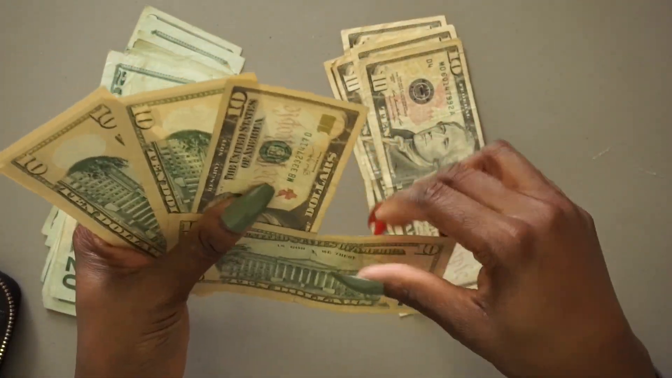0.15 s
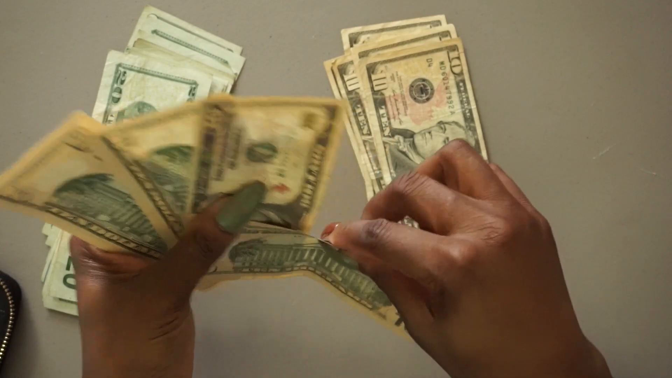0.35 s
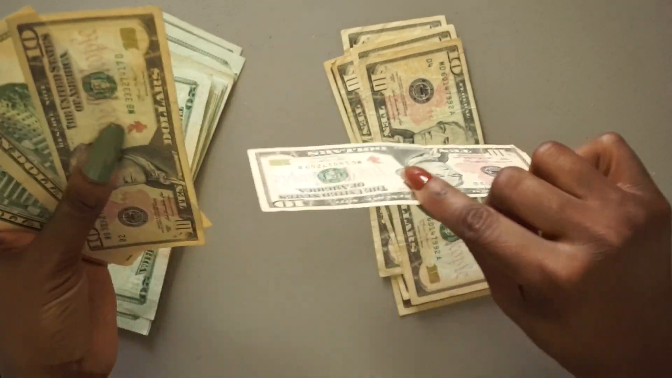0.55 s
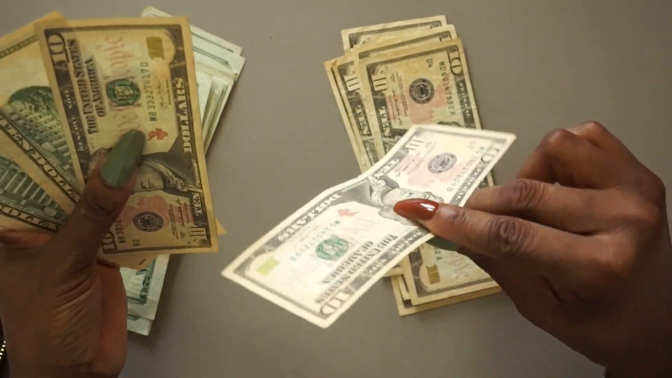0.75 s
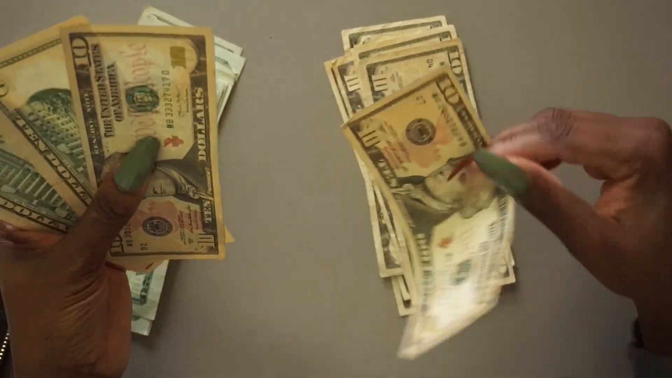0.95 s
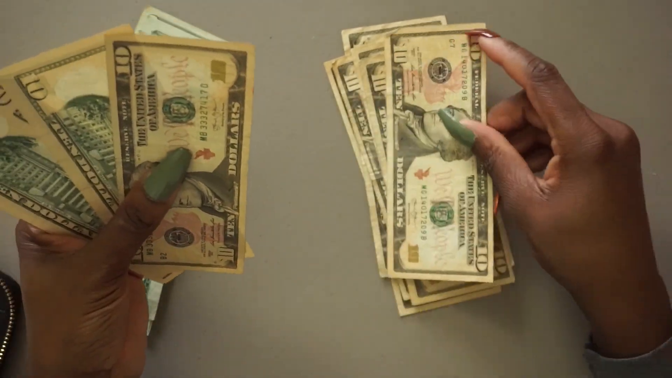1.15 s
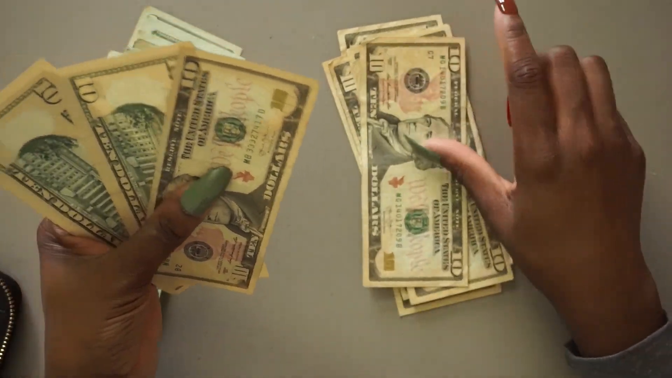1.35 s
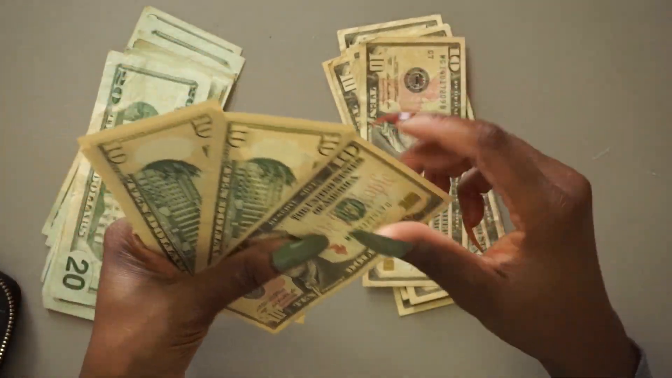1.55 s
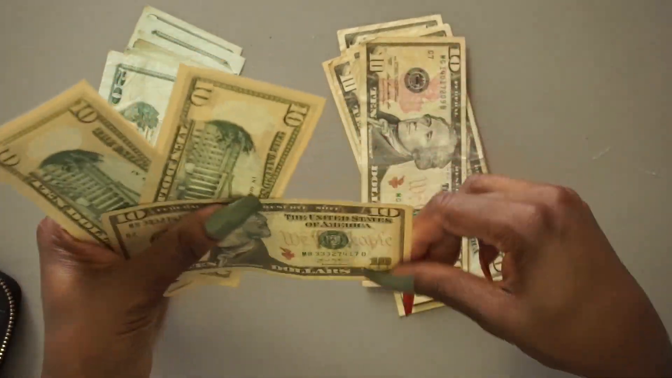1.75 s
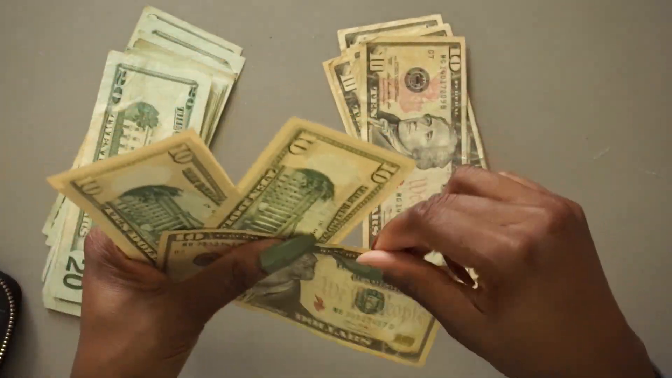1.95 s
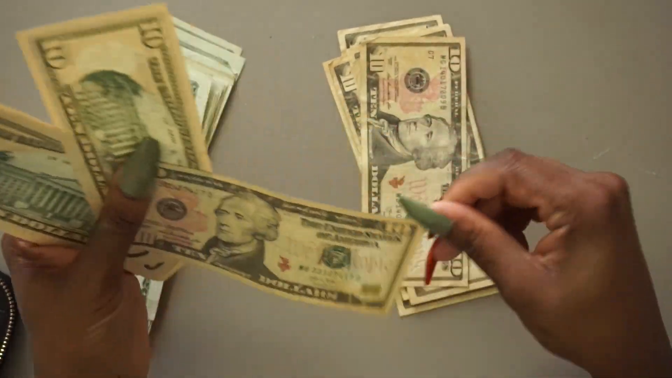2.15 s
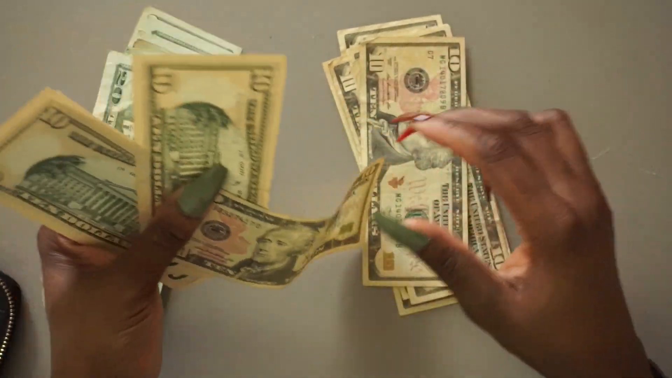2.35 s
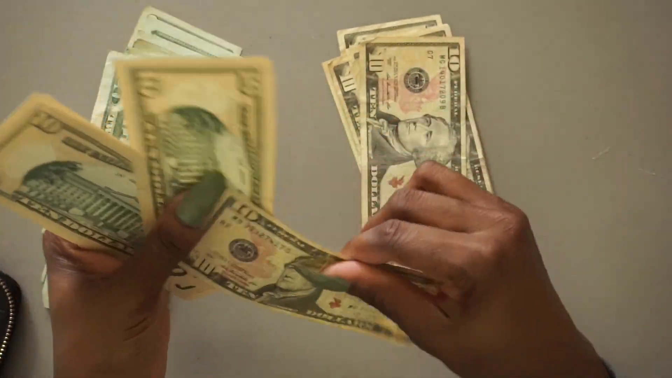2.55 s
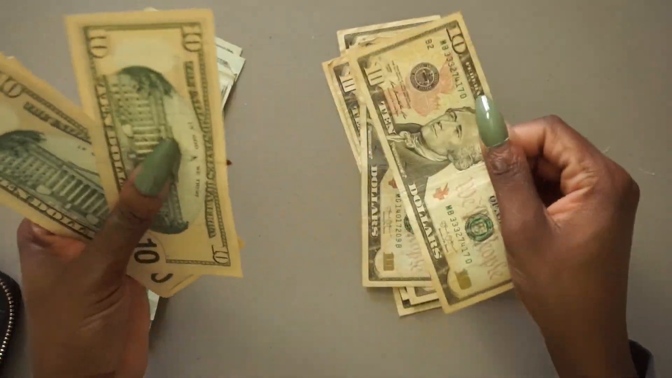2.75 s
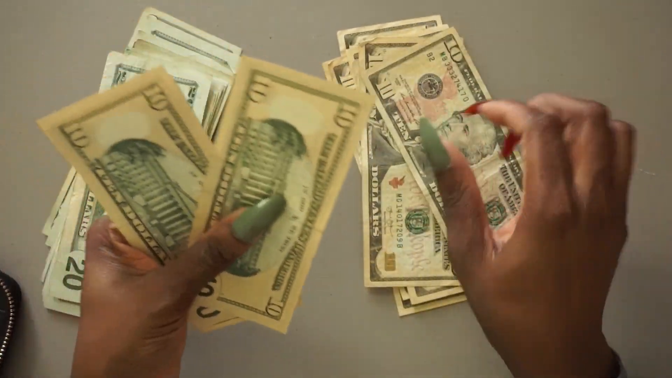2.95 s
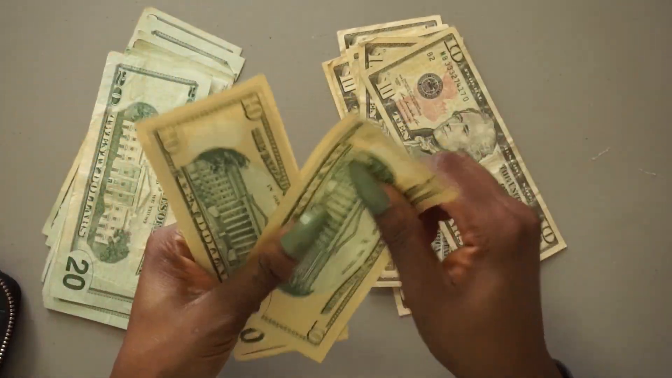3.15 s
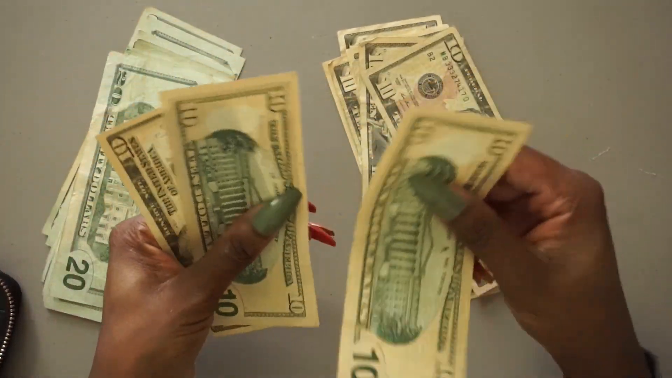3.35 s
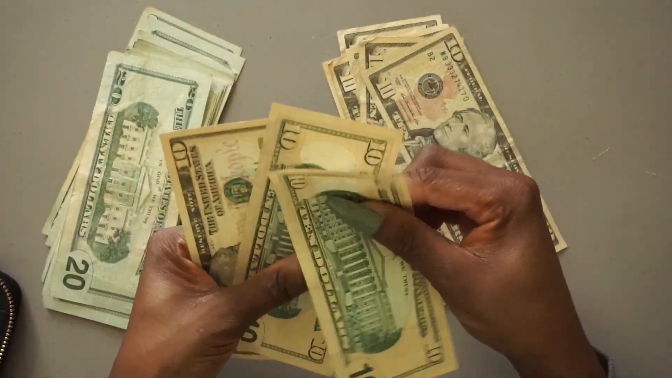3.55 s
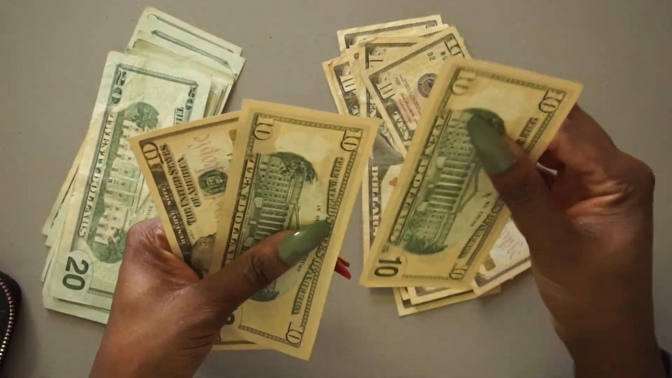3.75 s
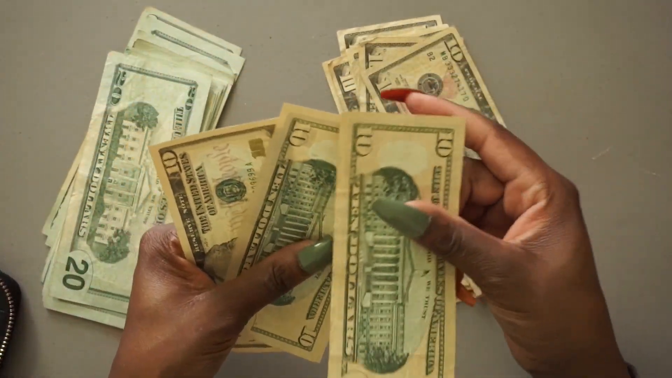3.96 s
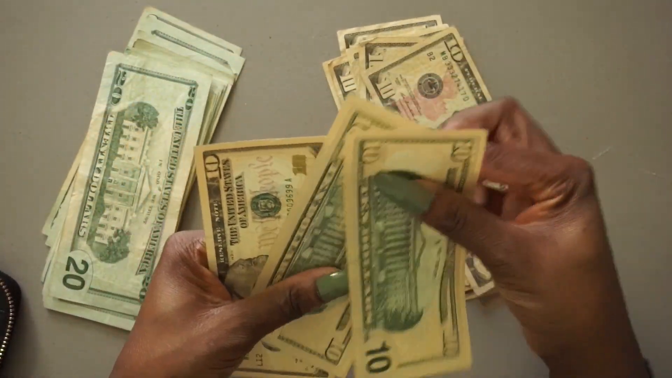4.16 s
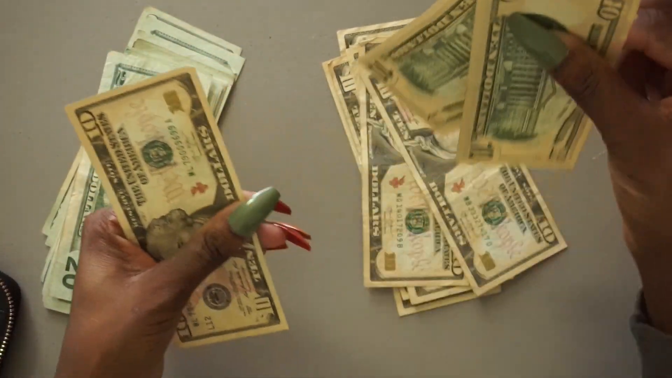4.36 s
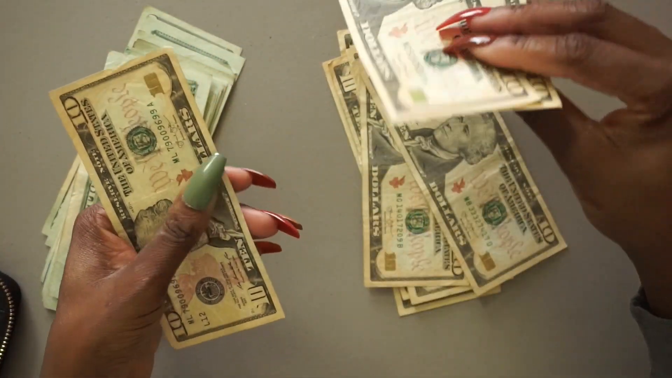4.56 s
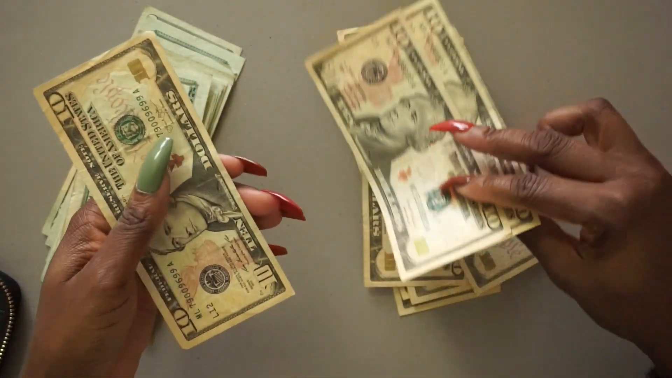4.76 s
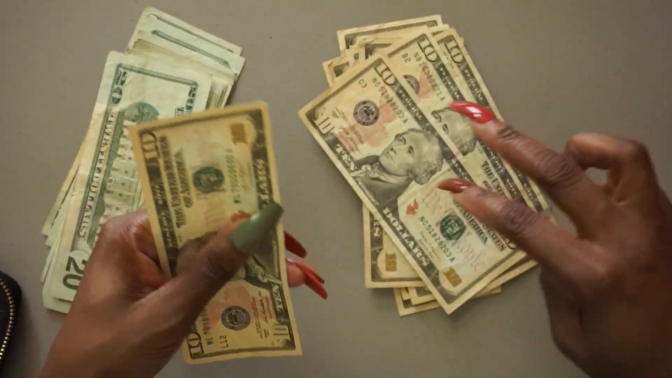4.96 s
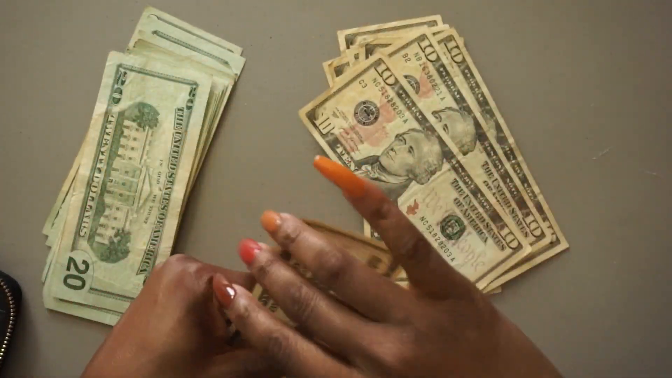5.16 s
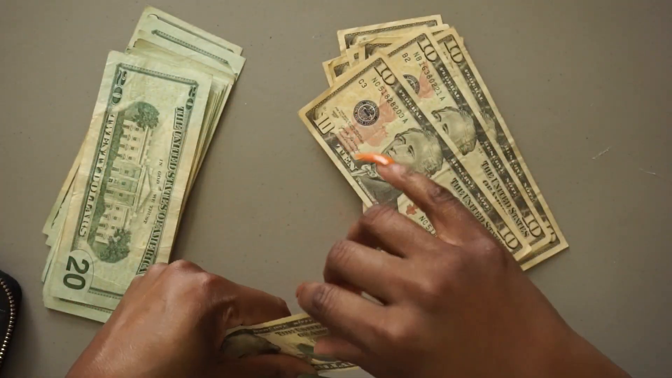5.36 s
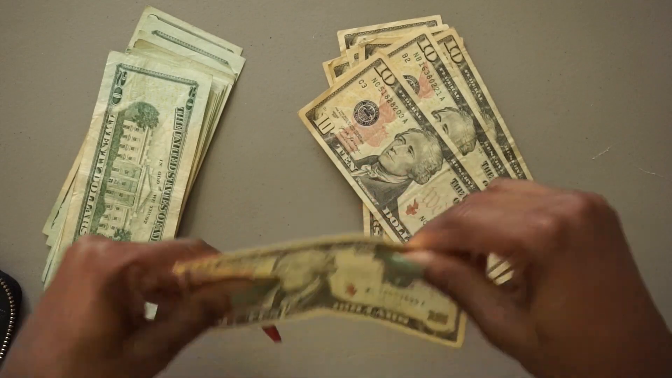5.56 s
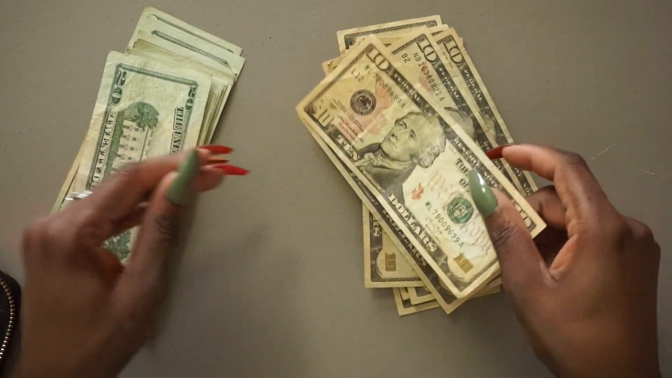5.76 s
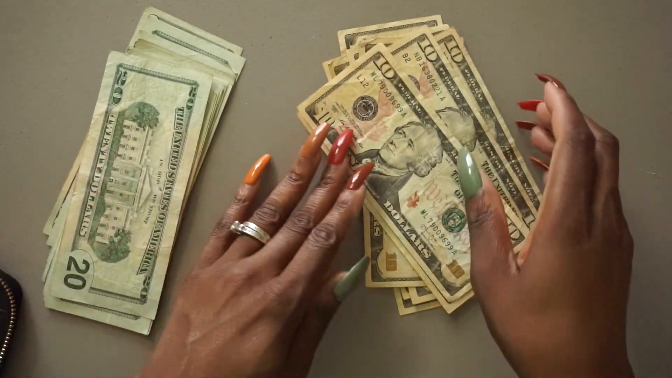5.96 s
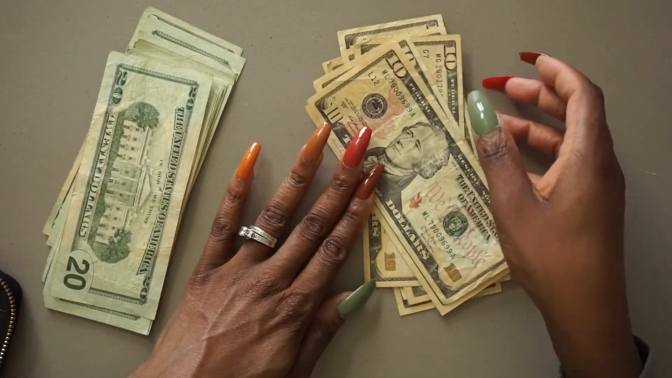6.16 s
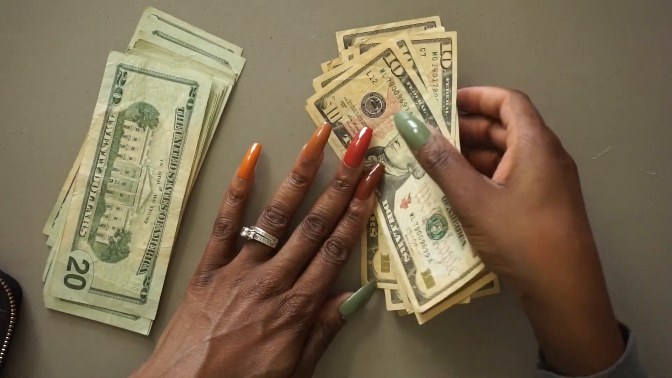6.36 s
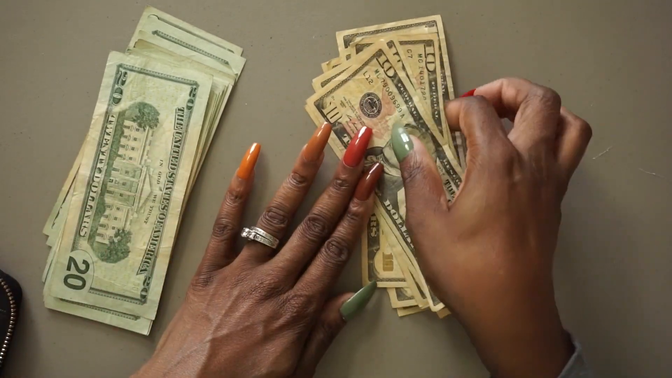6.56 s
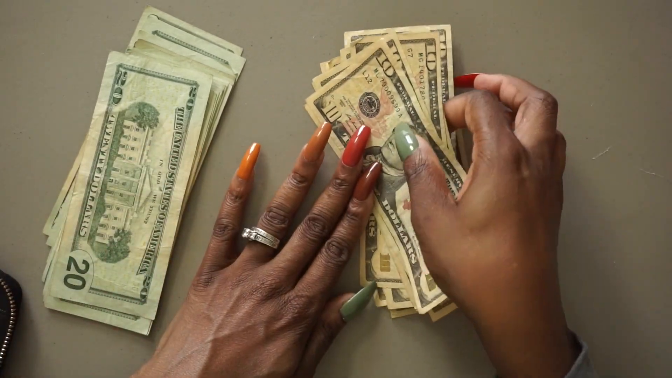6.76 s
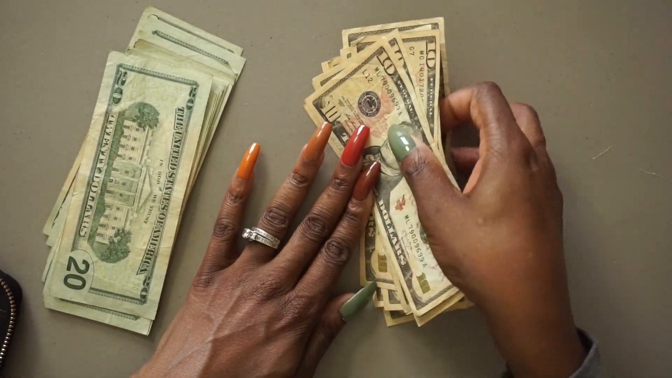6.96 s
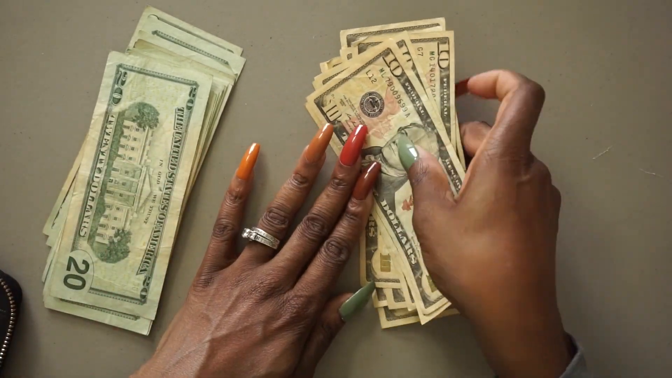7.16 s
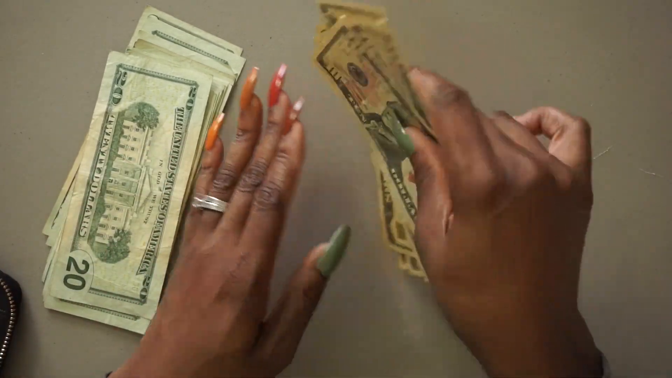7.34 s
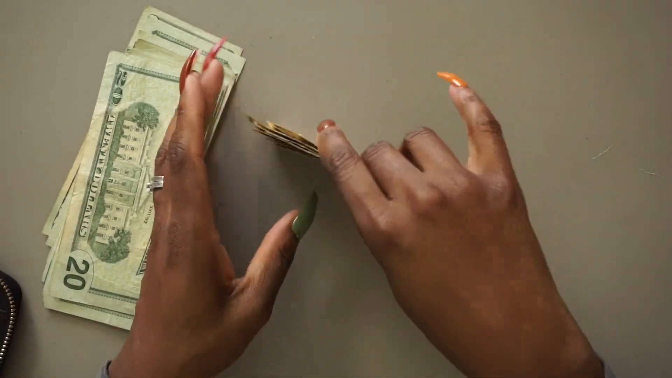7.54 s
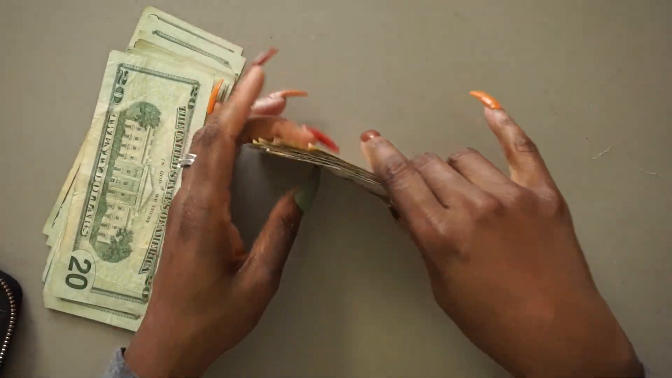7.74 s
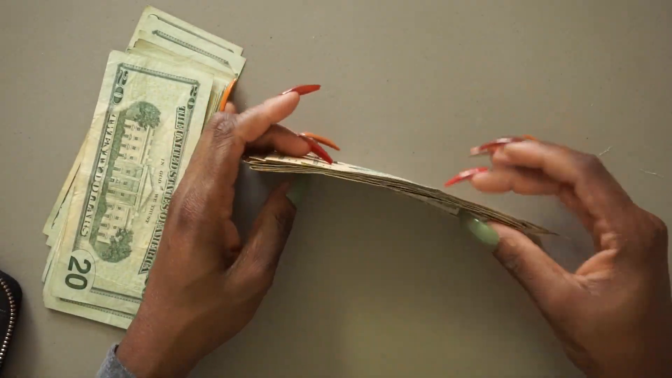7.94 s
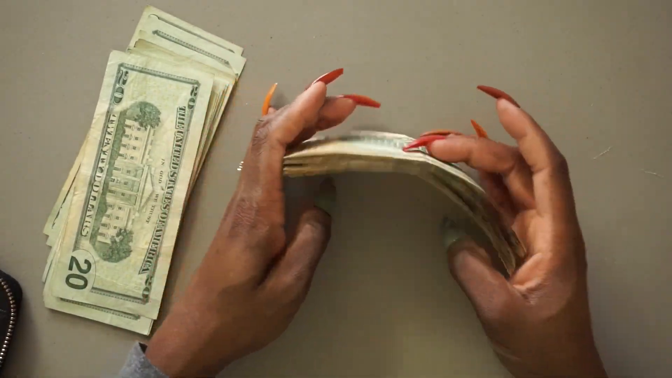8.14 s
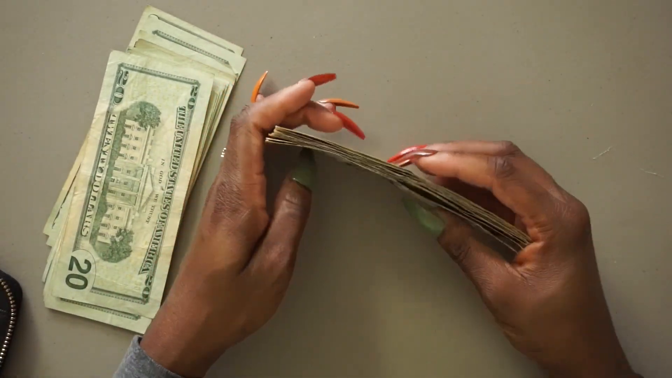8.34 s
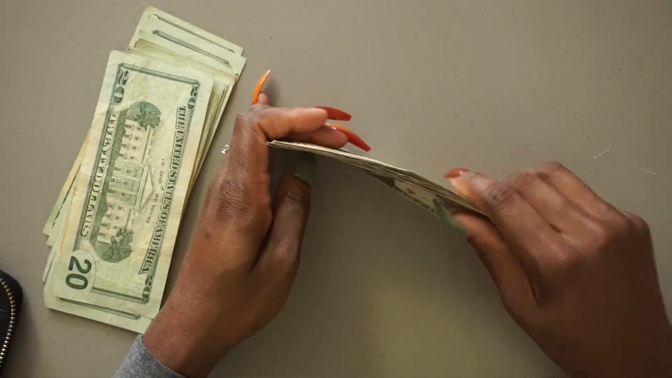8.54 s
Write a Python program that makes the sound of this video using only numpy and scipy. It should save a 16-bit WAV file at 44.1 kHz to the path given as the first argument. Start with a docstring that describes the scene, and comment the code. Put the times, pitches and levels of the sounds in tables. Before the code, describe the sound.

Hands count crisp paper bills, with dry sliding hiss, sharp little snaps and crinkles, ending in heavier taps and rustling as the stack is straightened.

```python
"""Paper banknotes are pulled from a fan, turned, laid on a pile and squared up on a table, close-miked in mono.
Sliding sheets are grainy noise under a moving hump; bent sheets rustle lower; snaps are ringing noise bursts over thuds.
Dragged edges scrape in one band, hands bump the table as decaying sines, and slow noise puffs at the microphone.
A quiet room hums behind as shaped noise; the loudest snaps overload the recorder."""
import sys
import numpy as np
from scipy import signal
from scipy.fft import rfft, irfft, next_fast_len
from scipy.io import wavfile
from scipy.ndimage import uniform_filter1d, map_coordinates

SR = 44100
rng = np.random.default_rng(int(sys.argv[2]) if len(sys.argv) > 2 else 0)


def unload_audio(sound):
    """Save the sound as a 16-bit wav file, at the path given as the first command line argument."""
    columns = np.transpose(np.atleast_2d(sound))
    # keep every value between -1 and 1, then stretch to whole-number steps
    steps = np.round(np.clip(columns, -1, 1) * 32767)
    wavfile.write(sys.argv[1], SR, steps.astype(np.int16))


N = 383663

# sheets drawn over each other: start t/s, length t/s, first level/dB, last level/dB, tail t/s per 20 dB,
# mid-stroke hump f/Hz, mid-stroke treble lift level/dB (from about 9 kHz up)
SLIDE_STROKES = [(0, 0.045, -33.5, -32.5, 0.0626, 3600, -2), (.05, 0.112, -30, -39, 0.012, 4500, 4),
                 (.222, 0.0153, -36, -38, 0.02, 4800, 4), (0.276, 0.012, -44.5, -46, 0.22, 4000, -2),
                 (0.305, 0.043, -36.5, -31, 0.0551, 3800, -1.5), (0.359, 0.09, -30, -24, 0.04, 4950, 5.5),
                 (0.519, 0.0277, -46, -38.5, 0.08, 3200, -18.5),
                 (.652, 0.0287, -38.5, -34.5, 0.14, 3000, -17.5),
                 (0.854, 0.0537, -24.5, -23, 0.03, 3710, -7), (1.031, 0.0215, -35, -35, 0.2735, 5300, 9),
                 (1.192, 0.1133, -46, -33, 0.0274, 4400, 8), (1.656, 0.1403, -31, -26, 0.0384, 4200, 1.5),
                 (1.962, 0.00089, -24, -25, 0.0237, 3400, -7), (2.012, 0.15, -28, -26.5, 0.062, 5800, 5),
                 (2.508, .018, -42, -35, 0.012, 4800, 5), (2.55, 0.055, -34, -32, 0.04, 5000, 3),
                 (2.676, 0.065, -40, -43, 0.04, 4300, 2), (2.862, 0.03, -50, -42, 0.1, 5000, 11),
                 (2.903, .016, -26, -32, .008, 7000, 8), (3.187, 0.0526, -20.5, -21, 0.0778, 4200, 1),
                 (3.31, 0.119, -27.5, -24.5, 0.1942, 4320, -1.5),
                 (3.59, 0.0605, -25.5, -19.5, 0.0326, 4690, 1.5),
                 (3.668, 0.017, -23.5, -25, 0.0922, 4500, -0.5),
                 (3.715, 0.0143, -26, -28, 0.092, 3800, 1.5), (3.821, 0.0362, -32, -27, 0.1217, 4630, -0.5),
                 (3.99, 0.133, -39, -36, 0.1651, 4340, 2), (4.132, 0.0014, -19.5, -20.5, 0.16, 4720, 1.5),
                 (4.195, 0.0976, -20, -12.5, 0.05, 6240, 2.5),
                 (4.437, 0.0689, -29.5, -25.5, 0.065, 4530, -3),
                 (4.848, 0.051, -31, -30, 0.0029, 4400, 6.5), (5.18, 0.045, -33, -23, 0.0424, 4790, 2),
                 (5.235, 0.0436, -28, -30, 0.0223, 4980, -5), (5.422, 0.03, -40, -38, 0.2, 4600, 1),
                 (5.488, .054, -32, -20, 0.0449, 4600, 3.5), (5.556, 0.0519, -15.5, -16, 0.1, 5300, 4.5),
                 (5.86, 0.0264, -34.5, -39, 0.035, 5500, 6), (5.951, 0.00052, -24.5, -25, 0.08, 3120, -10),
                 (6.037, 0.0002, -30, -30, 0.073, 2900, -4), (6.09, 0.0773, -42.5, -32, 0.29, 4520, 7.5),
                 (6.327, 0.051, -38, -28, 0.31, 3900, 0.5), (6.438, 0.065, -34, -34, 0.0337, 2200, 7.5),
                 (6.562, 0, -36.5, -36.5, 0.16, 2700, -7.5), (6.646, 0.054, -35, -33, 0.0533, 4120, 10),
                 (6.733, 0.024, -35.5, -36.5, 0.23, 4100, 8.5), (6.858, 0.0572, -30.5, -28, 0.022, 3600, 7),
                 (6.962, 0.0384, -32, -19, 0.075, 4000, 4), (7.202, 0.1398, -37, -29, 0.06, 4945, 8),
                 (7.577, 0.033, -24, -20, 0.0433, 3600, 2.5), (7.671, .17, -32, -31, 0.11, 3410, 1.5),
                 (7.85, 0.0857, -26.5, -29, 0.12, 4030, 7), (7.955, 0.035, -24, -27, 0.045, 5000, 8),
                 (8.058, 0.0307, -39, -28, 0.02, 5000, 8.5), (8.099, 0.1677, -24.5, -22, 0.05, 4900, 3.5),
                 (8.287, 0.199, -28.5, -36, 0.25, 4370, 3), (8.507, 0.0644, -30, -22, .05, 4310, 5),
                 (8.585, 0.0594, -23.5, -28.5, 0.11, 4650, 6.5)]
STROKE_ONSET_S = 0.0101  # per 20 dB
# the free length of paper shortens during a stroke
GLIDE_OCTAVES_PER_S, BRIGHTENS_DB_PER_S = 2.47, 29
# the notes are never quite still in the hands: t/s, hiss level/dB, bending level/dB
HAND_FIDGET = [(0, -60.5, -50.5), (.78, -53.5, -50), (.97, -43.5, -46), (1.33, -49, -47),
               (1.63, -60, -47.5), (2.22, -49, -47), (2.48, -62.5, -47), (3.15, -53, -46.5),
               (3.7, -45.5, -44.5), (4.4, -44.5, -45.5), (4.82, -45.5, -46.5), (4.92, -37.5, -45.5),
               (5.2, -37, -48.5), (5.39, -55.5, -52), (5.93, -59.5, -47), (6.6, -46.5, -42),
               (7.1, -42.5, -40.5), (7.4, -42, -44), (7.55, -57.5, -52), (7.9, -45, -37.5),
               (8.7, -40, -42.5)]
FIDGET_HUMP_HZ = 4420
LIGHT_TOUCH_CUT_DB = 2.5  # taken from the broad part of the fidget hiss, below its hump
# sheets bent or dragged on the table: peak t/s, peak level/dB, rise t/s per 20 dB, tail t/s per 20 dB
SHEET_BENDS = [(.392, -34, 0.3758, 0.19), (.722, -36, .08, .19), (.853, -30.5, 0.045, 0.1046),
               (1.961, -31, 0.04, 0.047), (2.021, -31.5, 0.06, 0.1123), (2.571, -22.5, .025, 0.05),
               (3.19, -34.5, 0.0052, 0.18), (3.596, -29.5, 0.0741, 0.1652), (4.134, -33.5, 0.09, 0.37),
               (4.256, -32.5, .15, 0.2172), (4.503, -35, 0.15, 0.21), (5.225, -26, 0.07, 0.08),
               (5.58, -36, 0.34, 0.24), (6.039, -28, 0.0333, 0.0964), (6.188, -31, 0.14, 0.1839),
               (6.571, -27.5, 0.01, 0.17), (6.66, -31, 0.0867, 0.28), (6.859, -32, 0.0455, 0.13),
               (7.004, -26.5, 0.05, 0.1071), (7.329, -26, 0.04, 0.04), (7.576, -20, 0.005, 0.19),
               (7.628, -12.5, 0.035, 0.0808), (7.7, -23.5, 0.0222, 0.04), (7.785, -21, 0.12, 0.1378),
               (7.99, -32, 0.17, 0.15), (8.12, -27, 0.0767, 0.37), (8.268, -24, 0.0441, .02),
               (8.336, -28, .2, 0.23), (8.539, -27, 0.07, 0.16)]
# puffs of air at the microphone: peak t/s, peak level/dB
AIR_PUFFS = [(.33, -25), (1.82, -21.5), (2.42, -25), (3.23, -22.5), (3.56, -19), (3.99, -25), (4.25, -26),
             (5.72, -20), (7.34, -24.5), (8.15, -22), (8.7, -25.5)]
PUFF_RISE_S, PUFF_TAIL_S = 0.134, 0.154  # per 20 dB
DRAUGHT_DB = -32  # slow air between the puffs
# creases snapping and edges slapping: t/s, snap peak level/dB, ring f/Hz, 60 dB decay t/s, thud level/dB
CREASE_SNAPS = [(0.0198, -13, 4420, 0.0086, -30), (0.0402, -8, 4270, 0.0137, -23),
                (0.2097, -14.5, 5630, 0.0143, -52.5), (0.2143, -16.5, 5700, 0.018, -45.5),
                (0.3018, -19, 3450, 0.0325, -37.5), (0.3273, -16.5, 6560, 0.0103, -23.5),
                (0.4591, -16.5, 2460, 0.015, -25.5), (0.4983, -26.5, 3500, .008, -44),
                (0.677, -23.0, 1500, 0.0126, -23), (0.7157, -10.5, 1710, 0.017, -19),
                (0.8346, -5.5, 2720, 0.0116, -17), (0.8694, -11.5, 3580, 0.036, -33),
                (1.0507, -17, 3000, 0.0107, -28.0), (1.0606, -11.5, 5000, 0.0156, -43),
                (1.294, -20.5, 1600, 0.0163, -24.5), (1.6525, -13, 2440, 0.0122, -40),
                (1.658, -4.5, 3570, 0.0106, -20), (1.9498, -9.5, 2597, 0.00594, -21.5),
                (1.9573, -15.5, 4580, 0.024, -29), (1.992, -13, 5000, 0.045, -31.5),
                (2.006, -3.0, 2520, 0.0106, -25), (2.5231, -16, 4300, 0.012, -44),
                (2.539, -22, 6000, .006, -50), (2.5539, -13, 5370, 0.0295, -24),
                (2.5766, -3, 1462, 0.0044, -13.5), (2.753, -24, 3800, .01, -50),
                (2.807, -23.5, 6600, 0.018, -53), (2.9005, -5, 7000, 0.03, -33),
                (3.1317, -13.5, 5020, 0.0037, -47), (3.1375, -12.5, 4370, 0.0032, -45.5),
                (3.1757, -10.5, 3800, 0.0225, -21.5), (3.1887, -1.5, 7200, 0.004, -19.5),
                (3.193, -9.5, 3520, 0.052, -24), (3.4366, -7, 5800, 0.0092, -50),
                (3.5303, -20, 4200, 0.0093, -29.5), (3.554, -21, 3970, 0.0078, -31),
                (3.569, -20.5, 4390, 0.0078, -30), (3.5883, -25.5, 1500, 0.0156, -14.5),
                (3.6614, -1.5, 3780, 0.0145, -17.5), (3.8875, -10.5, 5470, 0.0136, -30.5),
                (3.8929, -12.5, 4800, 0.0045, -35), (4.1234, -8, 3600, 0.0287, -24),
                (4.139, -8, 2700, 0.01, -24.5), (4.158, -13.5, 5100, 0.023, -34.5),
                (4.4965, -13, 3900, 0.0166, -21.5), (5.0226, -12, 3880, 0.0055, -19),
                (5.1510, -14, 4860, 0.021, -39.5), (5.218, -8, 1700, .045, -19),
                (5.2457, -12, 1506, 0.031, -19.5), (5.4016, -23, 3420, 0.012, -46.5),
                (5.45, -13, 5830, 0.0139, -23), (5.4643, -8, 2650, 0.0102, -20.5),
                (5.561, -12, 3120, 0.04, -33), (5.5836, 4, 4310, 0.0116, -16.5),
                (5.939, -8, 5120, 0.0056, -33.5), (6.0267, -9.5, 1520, 0.0377, -18.5),
                (6.2546, -8.5, 3900, 0.0145, -38.5), (6.4417, -10.5, 3800, 0.0073, -26.5),
                (6.544, -15, 2200, 0.0314, -40), (6.5495, 0.0, 8800, 0.0091, -18.5),
                (6.5625, 2, 2070, 0.0197, -5), (6.6948, -15.5, 2050, 0.0131, -21),
                (6.8488, 6.5, 8880, 0.0185, -20), (6.8527, 2, 8100, 0.018, -17.5),
                (6.8562, 7, 4560, 0.0113, -18.5), (6.9925, -3, 4500, 0.012, -17),
                (6.997, 0, 2780, 0.03, -24), (7.1697, -23.5, 3100, 0.0065, -32.5),
                (7.234, -5.5, 3780, 0.0126, -34.5), (7.278, 2, 4814, 0.00526, -14.5),
                (7.3203, 1.5, 6250, 0.0134, -15.5), (7.572, -16, 1590, 0.0207, -16.5),
                (7.59, -0.5, 3720, 0.0049, -19), (7.6018, 10.5, 2620, 0.029, -3),
                (7.612, 5, 1800, 0.0085, -3.5), (7.6214, 3.5, 3820, 0.0596, -3.5),
                (7.6275, 14.5, 1880, 0.0116, 2.5), (7.661, -7, 5260, 0.0117, -16),
                (7.7001, -25, 1500, 0.014, -17.5), (7.7601, -12, 2720, 0.0074, -27.5),
                (7.8167, -11, 3000, 0.0048, -17), (7.907, -13.5, 3300, .005, -34),
                (7.974, -10, 7500, 0.005, -40), (7.9927, -26.5, 1500, 0.0106, -16.5),
                (8.0823, -13.5, 2090, 0.014, -19.5), (8.1077, 2.5, 1843, 0.0044, -11.5),
                (8.1812, -4, 4760, 0.0074, -34.5), (8.201, -1.5, 2500, 0.0095, -15),
                (8.2882, -16, 6270, 0.0124, -29.5), (8.3443, -13, 2680, 0.0116, -20.5),
                (8.356, -8, 8000, 0.0061, -21.5), (8.5174, -12.5, 4050, 0.027, -17.5),
                (8.5549, -9, 3950, 0.0103, -23)]
# soft bumps and knocks through table and air: t/s, envelope peak level/dB, pitch f/Hz, 60 dB decay t/s
TABLE_BUMPS = [(.241, -21, 75, .06), (0.332, -23, 60, 0.099), (0.678, -22.5, 335, 0.051),
               (.715, -18, 397, 0.0292), (1.301, -22.5, 77.2, 0.158), (1.559, -21, 27.8, 0.153),
               (1.91, -16.5, 45, 0.077), (2.414, -14, 40, 0.06), (5.705, -14, 48.4, 0.192),
               (6.563, -12.5, 274.2, 0.0794), (7.323, -16.5, 93.8, 0.068), (8.55, -20, 69.9, 0.17)]
# a dragged edge rings in one band: start t/s, length t/s, peak level/dB, band f/Hz
EDGE_SCRAPES = [(3.215, .045, -24, 5500), (5.145, .135, -32, 4900), (6.345, .065, -33, 4000),
                (6.35, .17, -34, 1600), (6.968, .078, -19, 2720), (6.985, .04, -21, 4300),
                (7.855, .065, -30, 4400), (8.555, .035, -25, 4000)]
SCRAPE_HALF_WIDTH_OCTAVES = .24  # where the band's power is down by about 8.7 dB

# relative spectrum of paper rubbing on paper: f/Hz, level/dB
RUB_SPECTRUM = [(410, -34), (700, -10), (1180, -6.5), (2990, -0.5), (4260, -2.5), (6830, -2), (16000, -18)]
# relative spectrum of a bending sheet: f/Hz, level/dB
BEND_SPECTRUM = [(60, -18), (110, -4.5), (300, -6), (420, -7.5), (800, -9), (1300, -14), (2000, -17),
                 (4000, -38)]
# relative spectrum of moving air: f/Hz, level/dB
AIR_SPECTRUM = [(2.4, -25.5), (4.0, 11), (16, 1), (130, -20), (170, -32), (290, -120)]
# relative spectrum of the room: f/Hz, level/dB
ROOM_SPECTRUM = [(24, -15), (40, 19.5), (69, 12.5), (189, -27), (337, 0.5), (433, -23.5), (733, -28),
                 (1180, -30), (3060, -46.5), (3650, -28), (5870, -45), (8770, -30), (16000, -103)]
# relative spectrum of a snap before its ring: f/Hz, level/dB
SNAP_SPECTRUM = [(350, -50.5), (600, -19.5), (2400, -1), (2720, -5), (3890, -5.5), (8270, -7),
                 (13200, -14.5), (16000, -24)]
# relative spectrum of a slap on the pile: f/Hz, level/dB
THUD_SPECTRUM = [(47, -30.5), (80, -5.5), (214, 3.5), (387, -5), (800, 1), (1250, -3.5), (2000, -9),
                 (2600, -38), (4400, -120)]
# a narrow band in the room's hum: centre f/Hz, distance to its -25 dB points f/Hz, level/dB
ROOM_HUM = (341, 93, -59.5)
ROOM_DB = -45
RECORDER_TOP_HZ = 15800


def amp(db):
    """Decibels to gain."""
    return 10 ** (np.asarray(db) / 20)


def unit(x):
    """Bring a signal to rms 1 along the last axis."""
    return x / np.sqrt(np.mean(x ** 2, axis=-1, keepdims=True) + 1e-20)


def along(points, hz):
    """Read a spectrum's dB between its points on a log frequency axis."""
    f, level_db = np.transpose(points)
    return np.interp(np.log(hz + 1), np.log(f + 1), level_db)


def curves(rows, t):
    """Read each column after the time at times t."""
    s, *columns = np.transpose(rows)
    return [np.interp(t, s, column) for column in columns]


def coloured(x, spectrum):
    """Filter x through a spectrum table and bring it to rms 1."""
    m = next_fast_len(x.shape[-1] + 8192)
    gain = amp(along(spectrum, np.fft.rfftfreq(m, 1 / SR)))
    return unit(irfft(rfft(x, m) * gain, m)[..., :x.shape[-1]])


def wobble(rate):
    """A smooth random curve with rate knots a second."""
    knots = rng.standard_normal(int(N * rate / SR) + 4)
    return map_coordinates(knots, [np.arange(N) * rate / SR])


def smoothed_noise(shape, bins, frames):
    """Random patches across frequency and time, with standard deviation 1."""
    patches = uniform_filter1d(rng.standard_normal(shape), size=bins, axis=0)
    patches = uniform_filter1d(patches, size=frames, axis=1)
    return patches / patches.std()


def swells(t, peak_s, peak_db, rise_s, tail_s):
    """Power of each event over time: it climbs and dies by 20 dB in the given times."""
    late = t - np.asarray(peak_s)[:, None]
    rising = -late / np.reshape(rise_s, (-1, 1))
    falling = late / np.reshape(tail_s, (-1, 1))
    spans = np.where(late < 0, rising, falling)
    return amp(2 * (np.asarray(peak_db)[:, None] - 20 * np.minimum(spans, 10)))


def envelope(power, t):
    """Gain per sample from power at times t."""
    return np.interp(np.arange(N) / SR, t, np.sqrt(power))


def fibres(rate, spread_db, share, life):
    """Friction: noise roughened by tiny catches of uneven size, rising and fading over about life seconds."""
    size = np.minimum(rng.exponential(size=N), 2)
    catches = (rng.random(N) < rate / SR) * amp(spread_db * size)
    bursts = signal.filtfilt([1], [1, -np.exp(-1 / (abs(life) * SR))], catches)
    share = np.clip(share, 0, 1)
    smooth = np.sqrt(1 - share) * rng.standard_normal(N)
    rough = np.sqrt(share) * unit(bursts * rng.standard_normal(N))
    return unit(smooth + rough)


def banded(x, depth_db):
    """A held sheet has many narrow resonances, heard as bands that keep shifting."""
    z = signal.stft(x, nperseg=1024)[2]
    gain = amp(depth_db * smoothed_noise(z.shape, bins=3, frames=9))
    return unit(signal.istft(z * gain, nperseg=1024)[1][:N])


def strokes(t):
    """Level, hump, treble lift and light-touch share of the hiss; the louder of overlapping strokes leads."""
    start_s, length_s, first_db, last_db, tail_s, hump_hz, lift_db = np.transpose(SLIDE_STROKES)[..., None]
    into = np.clip(t - start_s, 0, length_s)
    before = np.maximum(start_s - t, 0) / STROKE_ONSET_S
    after = np.maximum(t - start_s - length_s, 0) / tail_s
    level_db = first_db + (last_db - first_db) * into / np.maximum(length_s, 1 / SR)
    level_db = level_db - 20 * np.minimum(before + after, 10)
    power = amp(2 * level_db)
    fidget = amp(2 * curves(HAND_FIDGET, t)[0])
    total = power.sum(axis=0) + fidget
    # each stroke pulls hump and treble in proportion to its power
    past_middle = into - length_s / 2
    hump = power * hump_hz * 2 ** (GLIDE_OCTAVES_PER_S * past_middle)
    hump = (hump.sum(axis=0) + fidget * FIDGET_HUMP_HZ) / total
    lift = power * (lift_db + BRIGHTENS_DB_PER_S * past_middle)
    return 10 * np.log10(total), hump, lift.sum(axis=0) / total, fidget / total


def slide():
    """Sheets rubbing: a hiss whose broad hump moves with the free length of paper, with its own top end."""
    friction = fibres(rate=600, spread_db=6, share=0.253, life=0.00082)
    rub = amp(1.58 * wobble(50)) * banded(friction, depth_db=2.0)
    hz, t, z = signal.stft(coloured(rub, RUB_SPECTRUM), SR, nperseg=256)
    hiss_db, hump_hz, lift_db, light = strokes(t)
    octaves = np.log2((hz[:, None] + 1) / hump_hz)
    # a light touch sounds thinner below its hump
    broad = 0.7106 * amp(-LIGHT_TOUCH_CUT_DB * light * (octaves < -0.3))
    hump = broad + 0.639 * np.exp(-(octaves / 0.5) ** 2)
    top = 1 / (1 + (9000 / (hz[:, None] + 1)) ** 8)
    level_db = hiss_db + lift_db * top
    patchy_db = 1.955 * smoothed_noise(z.shape, bins=5, frames=6)
    return signal.istft(z * hump * amp(level_db + patchy_db), SR, nperseg=256)[1][:N]


def flap():
    """Bending sheets give a lower, lumpier rustle, with slower and longer catches."""
    t = np.arange(0, N, 64) / SR
    power = swells(t, *np.transpose(SHEET_BENDS)).sum(axis=0) + amp(2 * curves(HAND_FIDGET, t)[1])
    friction = fibres(rate=160, spread_db=6.5, share=0.348, life=0.0037)
    rub = banded(friction, depth_db=3.5)
    return envelope(power, t) * amp(1.59 * wobble(25)) * coloured(rub, BEND_SPECTRUM)


def air():
    """Waved paper pushes slow puffs of air at the microphone: low noise that swells over a faint draught."""
    t = np.arange(0, N, 64) / SR
    puffs = swells(t, *np.transpose(AIR_PUFFS), PUFF_RISE_S, PUFF_TAIL_S).sum(axis=0)
    power = puffs + amp(2 * DRAUGHT_DB)
    return envelope(power, t) * coloured(rng.standard_normal(N), AIR_SPECTRUM)


def room():
    """Indoor hum and hiss: shaped noise of gently wavering level, plus one steady narrow band."""
    hz, width_hz, db = ROOM_HUM
    band = coloured(rng.standard_normal(N), [(hz - width_hz, -25), (hz, 0), (hz + width_hz, -25)])
    bed = coloured(rng.standard_normal(N), ROOM_SPECTRUM)
    return amp(ROOM_DB + 1.56 * wobble(2.534)) * bed + amp(db) * band


def snaps():
    """Each snap is a sharp burst that rings the sheet near one pitch, with a duller thud under it."""
    out, t = np.zeros(N + 8192), np.arange(4096) / SR
    hz = np.fft.rfftfreq(len(t), 1 / SR)
    for s, db, ring_hz, t60, thud_db in CREASE_SNAPS:
        noise = rng.standard_normal((2, len(t)))
        width_hz = 0.108 * ring_hz
        resonance = width_hz * hz / np.hypot(ring_hz ** 2 - hz ** 2, width_hz * hz)
        # the longer a sheet rings, the purer its pitch
        ring = 0.417 * min(1, 0.0494 / t60) + 1.33 * resonance
        # a broad fold rings low and has little treble
        ring = ring * (0.5 + 1 / np.hypot(1, (hz / (3.38 * ring_hz)) ** 3))
        # every crease has its own uneven colour
        uneven_db = 3 * np.interp(hz, np.linspace(0, SR / 2, num=24), rng.standard_normal(24))
        burst = unit(irfft(rfft(noise[0]) * amp(along(SNAP_SPECTRUM, hz) + uneven_db) * ring))
        dull = unit(irfft(rfft(noise[1]) * amp(along(THUD_SPECTRUM, hz))))
        snap = amp(-60 * t / max(t60, .003)) * burst
        # the thud starts softer and dies later than the snap
        thud = amp(-60 * t / (t60 + 0.0189)) * (1 - np.exp(-t / 0.00069)) * dull
        out[round(s * SR):][:len(t)] += amp(db) * snap / np.abs(snap).max() + amp(thud_db) * thud
    return out[:N]


def walls(x):
    """A short, soft answer from table and walls: x convolved with decaying noise."""
    t = np.arange(SR // 4) / SR
    tail = rng.standard_normal(len(t)) * amp(-60 * t / .12) * (t > .002)
    return signal.fftconvolve(x, tail / np.linalg.norm(tail))[:N]


def bumps():
    """Each bump is a softly started, decaying low sine."""
    out, t = np.zeros(N + SR), np.arange(SR // 2) / SR
    for s, db, hz, t60 in TABLE_BUMPS:
        swell = (1 - np.exp(-t * hz / 0.16)) * amp(-60 * t / t60)
        tone = np.sin(2 * np.pi * hz * t)
        out[round(s * SR):][:len(t)] += amp(db) * swell / swell.max() * tone
    return out[:N]


def scrapes():
    """Coarse friction heard through one resonance of the note; each scrape arches up and stops."""
    rub = fibres(rate=400, spread_db=5, share=.6, life=.0015)
    hz, t, z = signal.stft(rub, SR, nperseg=256)
    start_s, length_s, db, band_hz = np.transpose(EDGE_SCRAPES)[..., None]
    arch = np.sin(np.pi * np.clip((t - start_s) / length_s, 0, 1)) ** 2
    power = amp(2 * db) * arch
    bands = np.exp(-2 * (np.log2((hz + 1) / band_hz) / SCRAPE_HALF_WIDTH_OCTAVES) ** 2)
    bands = bands / bands.mean(axis=1, keepdims=True)
    return signal.istft(z * np.sqrt(bands.T @ power), SR, nperseg=256)[1][:N]


def scene():
    """One microphone feeds both channels; only the snaps and their thuds get the wall answer."""
    hits = snaps()
    paper = slide() + scrapes() + flap() + hits
    mono = paper + amp(-13.5) * walls(hits) + air() + bumps() + room()
    return np.array([mono, mono])


def record(dry):
    """The recorder clips at full scale, then keeps nothing above its band limit."""
    m = next_fast_len(N + 8192)
    clipped = np.clip(dry, -1, 1)
    passed = np.fft.rfftfreq(m, 1 / SR) < RECORDER_TOP_HZ
    return irfft(rfft(clipped, m) * passed, m)[:, :N]


dry = scene()
out = record(dry)
unload_audio(out)
```